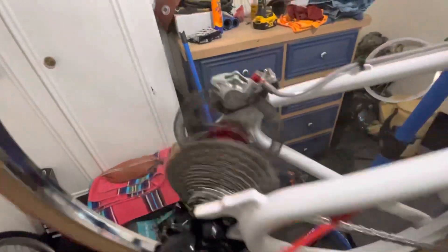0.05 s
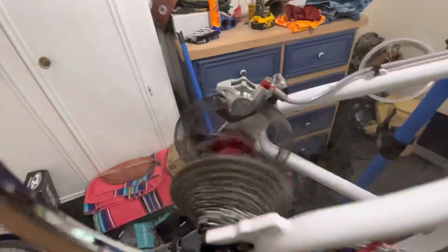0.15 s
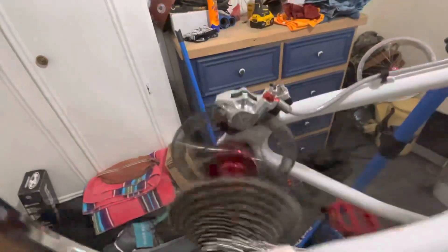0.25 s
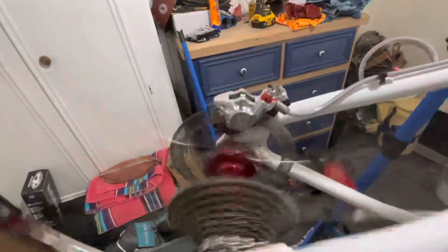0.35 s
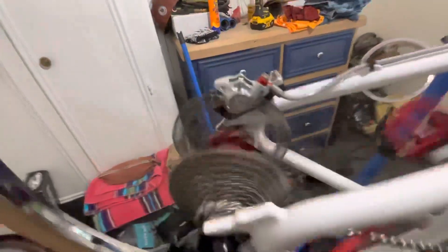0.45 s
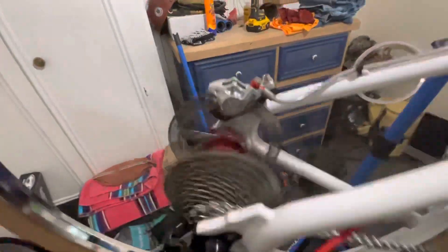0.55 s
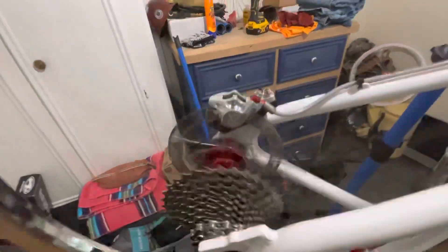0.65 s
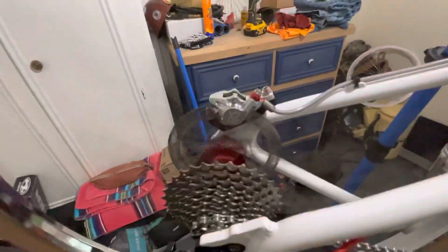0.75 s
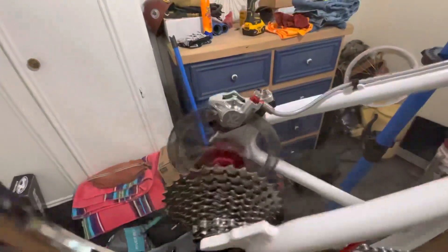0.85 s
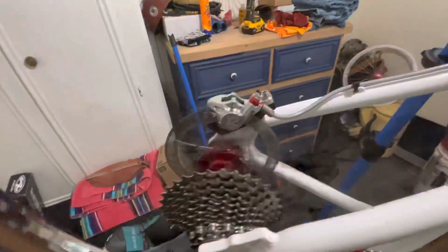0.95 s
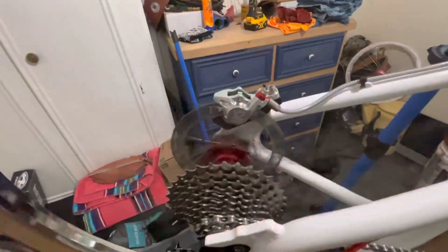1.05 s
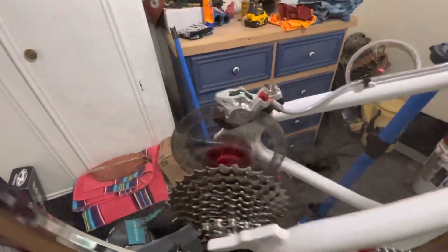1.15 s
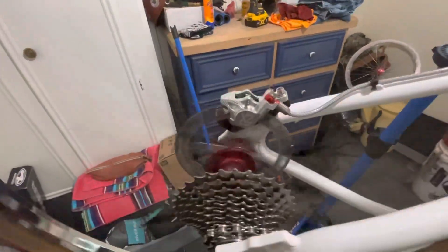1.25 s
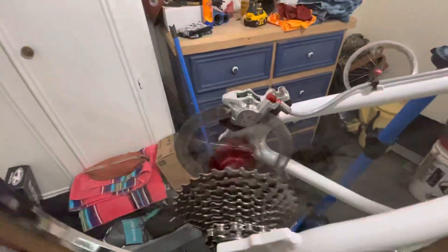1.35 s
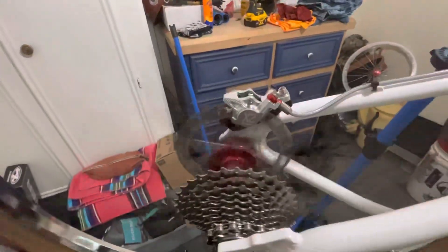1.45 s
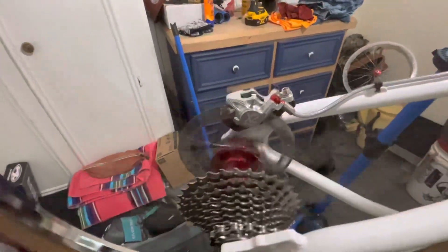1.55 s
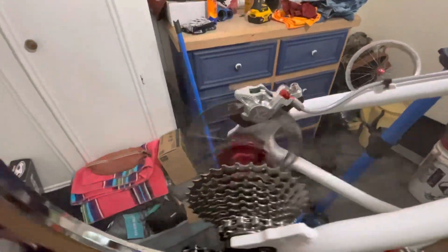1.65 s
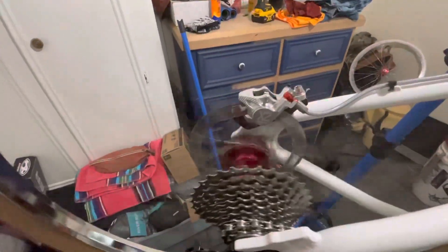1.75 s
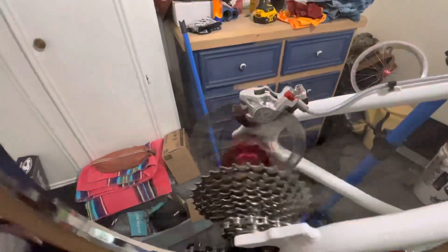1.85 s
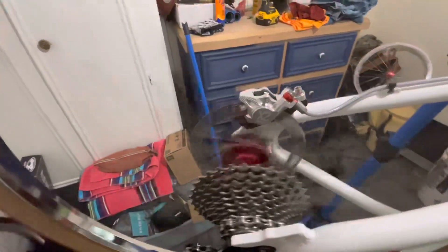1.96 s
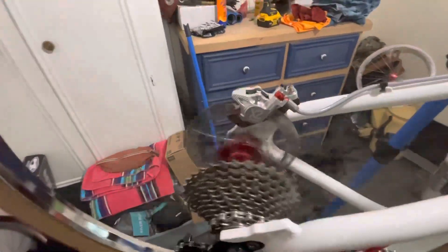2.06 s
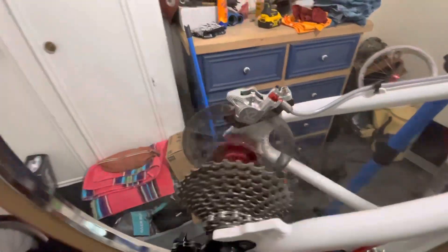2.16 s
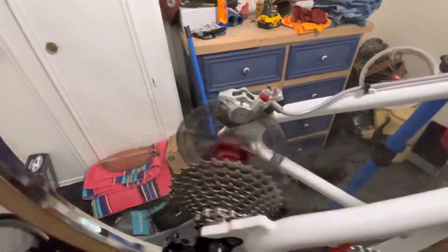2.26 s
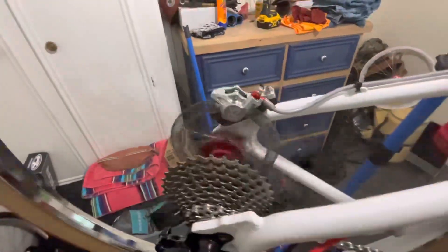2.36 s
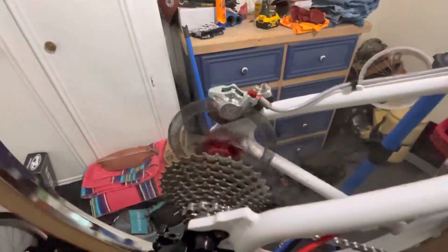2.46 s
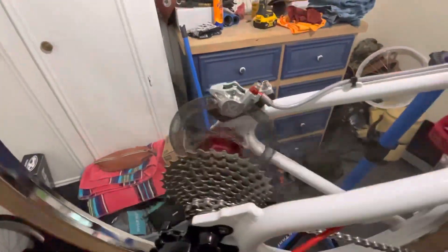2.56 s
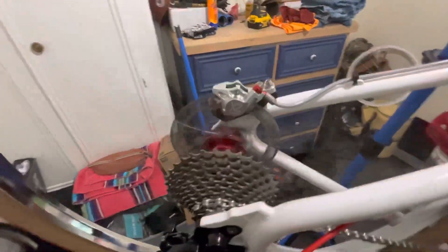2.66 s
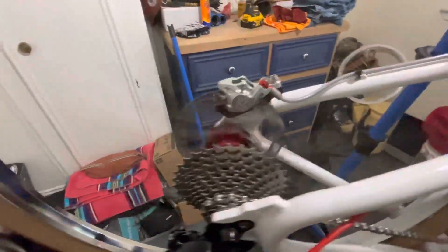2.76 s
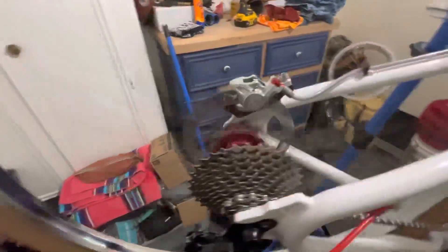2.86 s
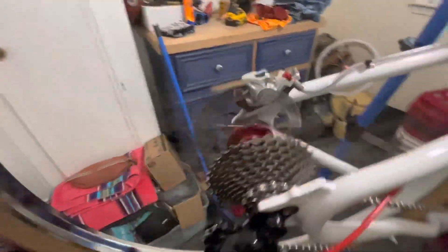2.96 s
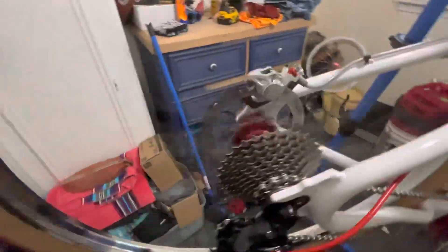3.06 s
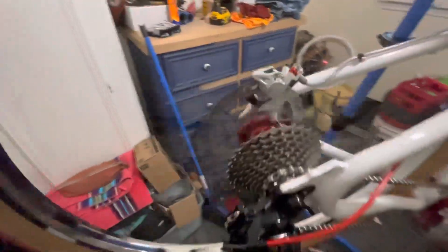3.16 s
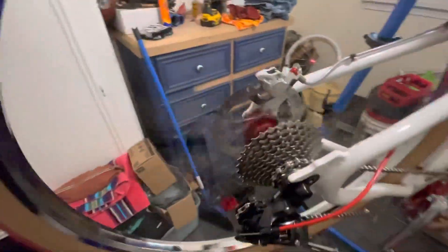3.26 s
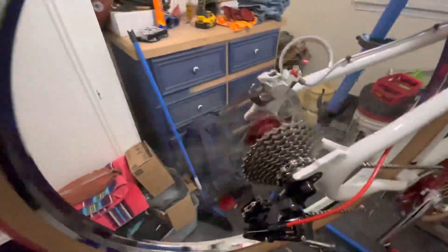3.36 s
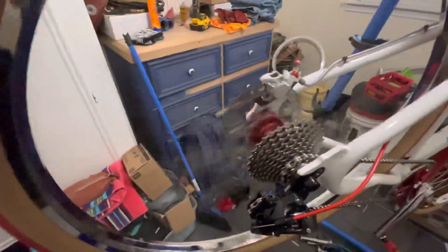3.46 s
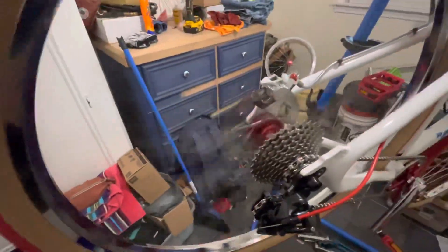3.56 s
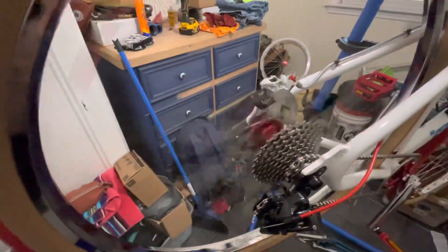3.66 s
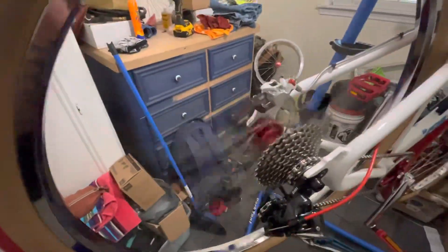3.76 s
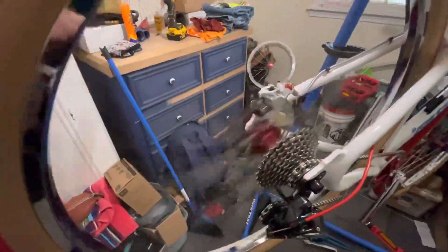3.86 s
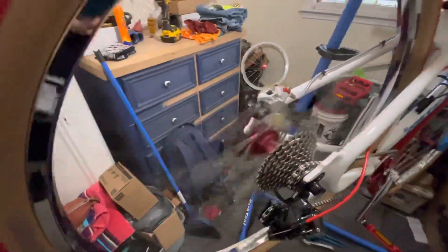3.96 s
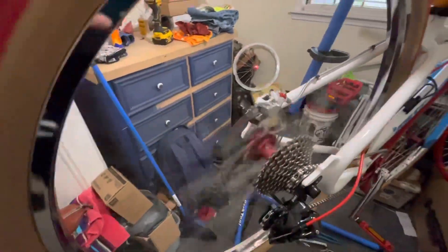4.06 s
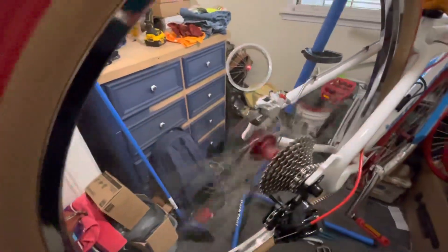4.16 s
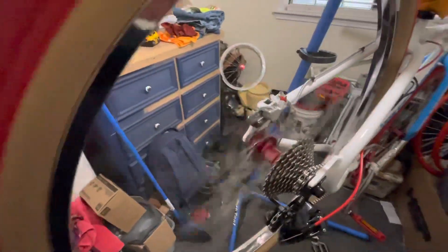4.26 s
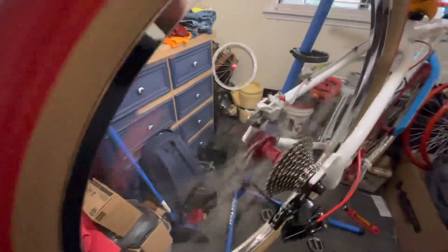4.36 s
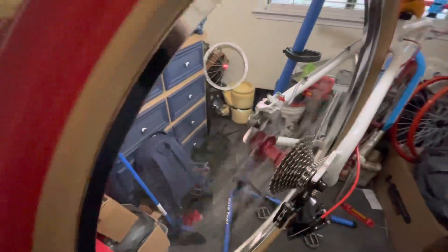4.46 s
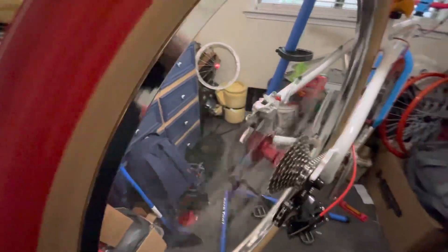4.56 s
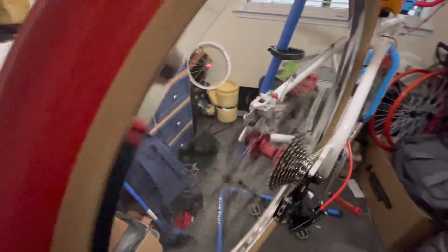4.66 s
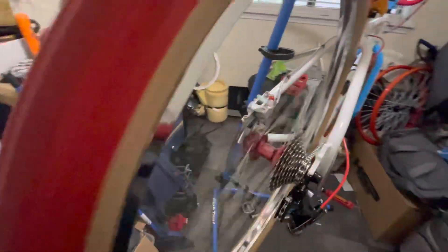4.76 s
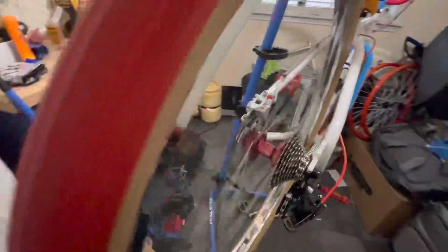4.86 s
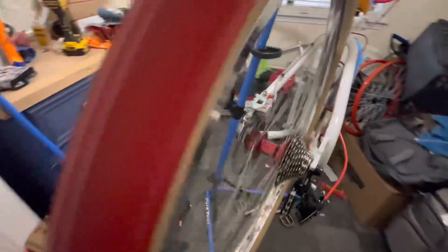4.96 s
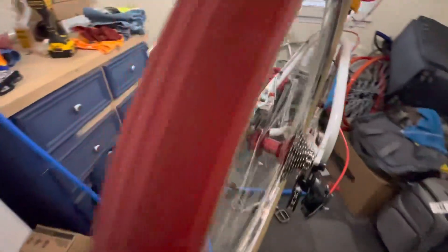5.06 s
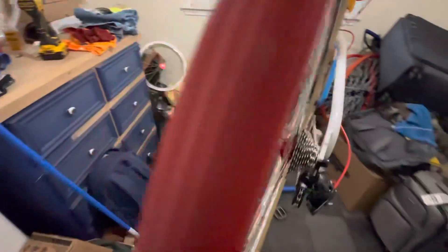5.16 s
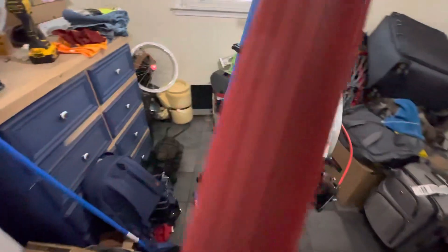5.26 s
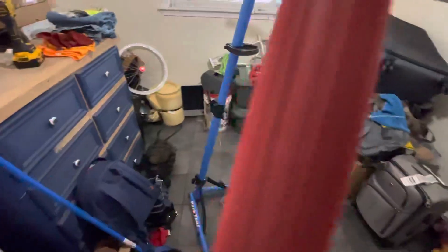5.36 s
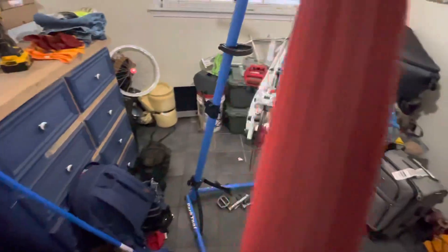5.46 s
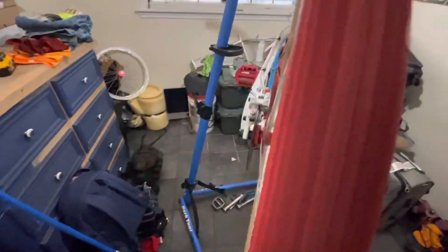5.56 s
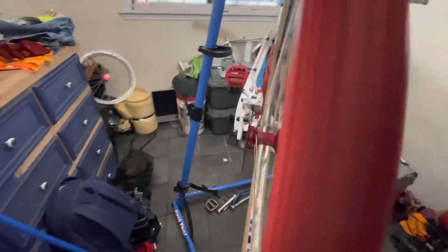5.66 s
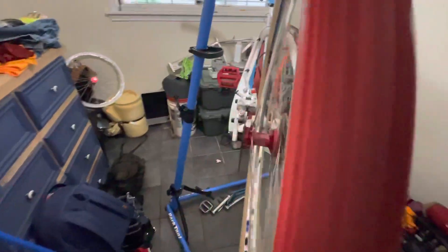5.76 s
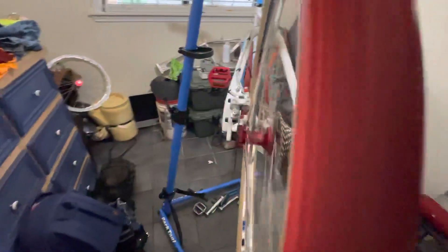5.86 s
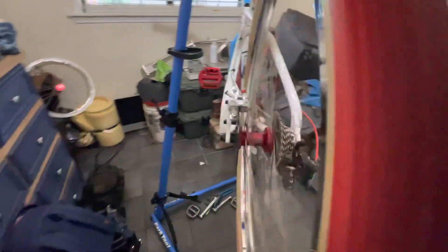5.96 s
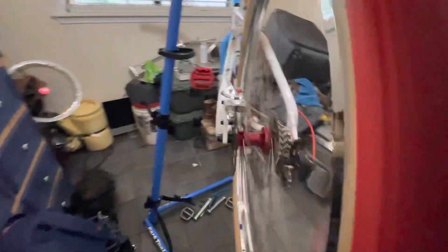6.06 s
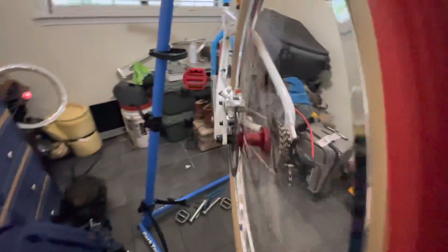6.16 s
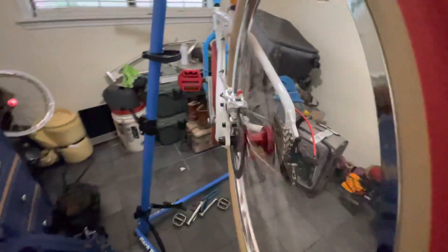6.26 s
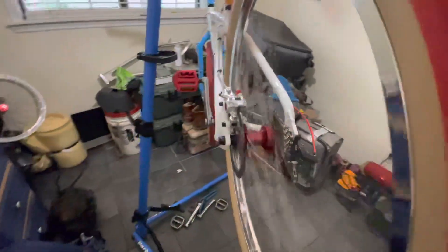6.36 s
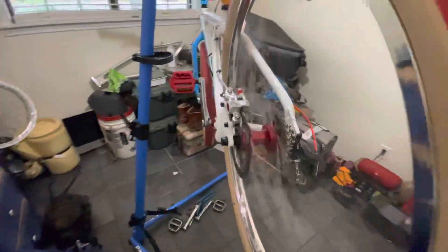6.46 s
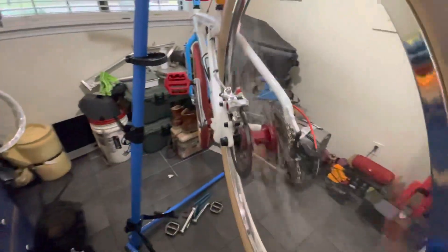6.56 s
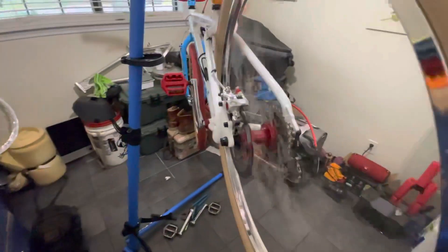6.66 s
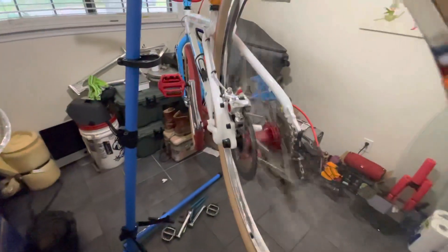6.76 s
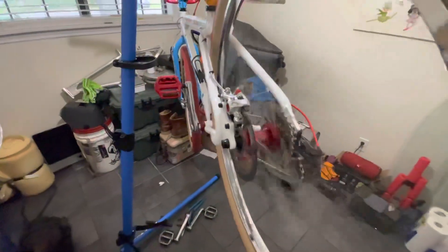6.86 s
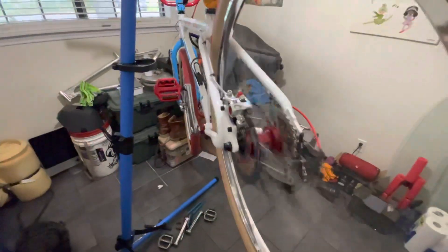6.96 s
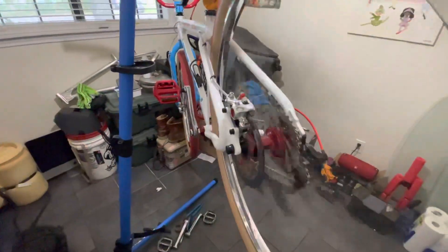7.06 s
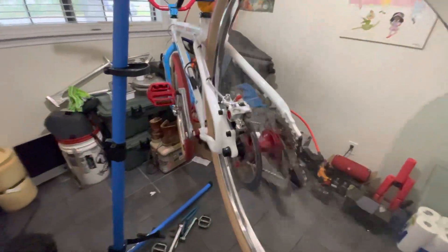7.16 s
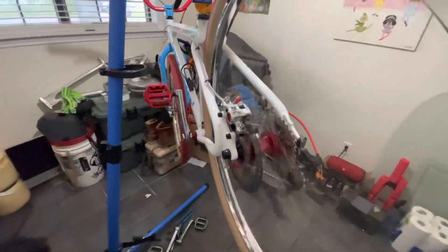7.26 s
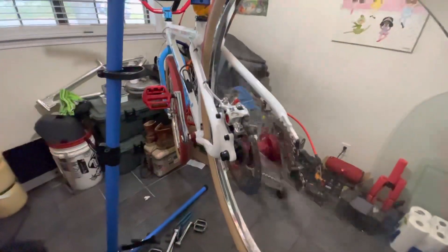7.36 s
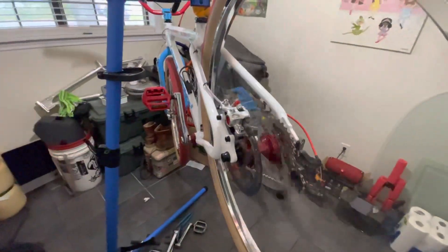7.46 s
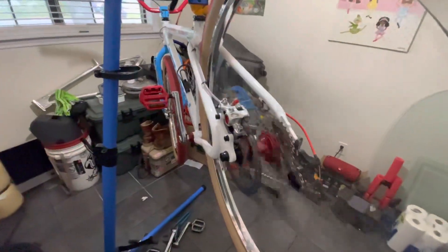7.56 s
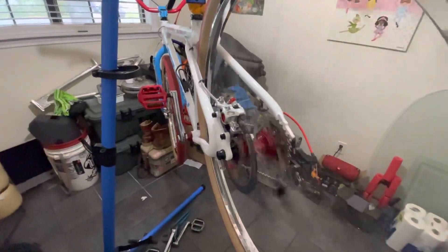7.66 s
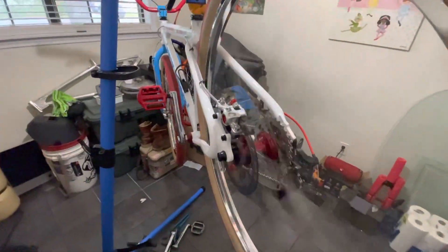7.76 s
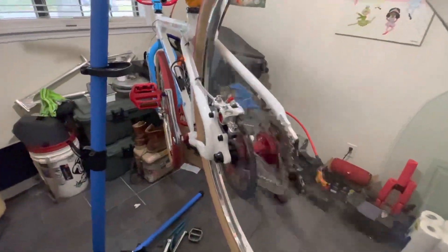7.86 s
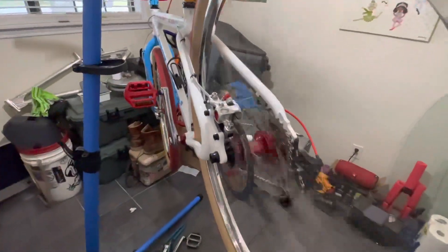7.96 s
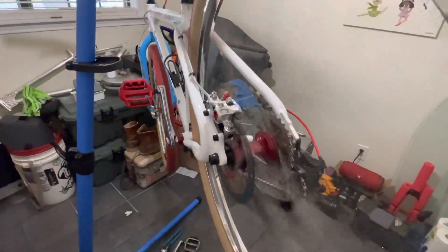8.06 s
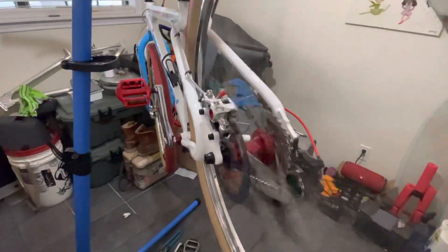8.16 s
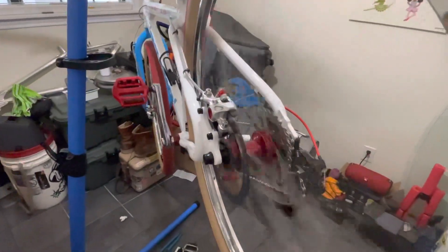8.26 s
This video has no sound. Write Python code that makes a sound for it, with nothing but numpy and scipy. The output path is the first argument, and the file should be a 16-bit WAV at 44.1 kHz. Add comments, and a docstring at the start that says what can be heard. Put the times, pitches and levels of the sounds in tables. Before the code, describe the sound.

A bicycle chain rattles and clanks over the rear sprockets for the first half second, heard close up in a small, quiet workshop. At about 0.5 seconds the drive lets go with a snap and the rear hub starts to buzz: a bright, dense stream of metallic ratchet clicks with a light steel ring. The buzz is loudest around 0.6 to 1.2 seconds, wavers slightly in pitch until about 3 seconds, then sinks slowly as the wheel loses speed. It grows softer towards 5.7 seconds, comes back up at 6 and is still going when the sound ends just after 8 seconds. Air from the spinning tyre buffets the microphone with low, fluttering puffs during the first 1.5 seconds and again from about 5 to 5.8 seconds. One soft, dull knock comes at about 7.3 seconds.

```python
"""Freehub coasting in a repair stand.

A small workshop, one microphone close to the wheel of a hanging bicycle. The chain rattles over the
sprockets for half a second, then the cranks stop and the freehub buzzes: three staggered pawls snap
over the ratchet teeth as the wheel slowly loses speed. The microphone moves round the wheel, whose
draught buffets it; one soft knock comes near the end."""
import sys
import numpy as np
from scipy import signal
from scipy.fft import rfft, irfft, next_fast_len
from scipy.io import wavfile
from scipy.ndimage import uniform_filter1d

SR = 44100
rng = np.random.default_rng(int(sys.argv[2]) if len(sys.argv) > 2 else 0)


def transcribe(signal):
    """Save signal, clipped to [-1, 1], as a 16-bit WAV file at the path in sys.argv[1]."""
    frames = np.atleast_2d(signal).T
    limited = np.clip(frames, -1, 1)
    pcm = np.round(limited * 32767).astype(np.int16)
    wavfile.write(sys.argv[1], SR, pcm)


N = 366912
T = np.arange(N) / SR
TEETH, PAWLS = 68, 3
COAST_S = .533  # the cranks stop

# the buzz as the microphone moves round the wheel (t/s, relative click level/dB, relative shell level/dB)
BUZZ_LEVELS = [(0.55, -21, -36), (0.61, -17.5, -26.5), (0.76, -19, -30), (1.15, -18.5, -29),
               (1.3, -21.5, -33.5), (2.4, -22.5, -32.5), (2.75, -23, -35.5), (2.81, -22, -33.5),
               (3.46, -25, -33.5), (4.83, -27, -36), (5.74, -29, -34), (5.95, -24.5, -32.5),
               (7.46, -23, -32.5), (8.28, -23.5, -32.5)]


def freehub():
    """Pawl strikes click, shake the hub and frame, and keep the steel parts ringing."""
    # ratchet speed: uneven while the cassette still creeps, then a slow run-down (t/s, tooth rate/Hz)
    speed = [(0.62, 293.4), (0.68, 295), (0.74, 323.8), (0.83, 317.2), (0.94, 334.0), (1.07, 320.8),
             (1.21, 330), (1.7, 320.2), (1.83, 330.3), (1.96, 327), (2.08, 344.3), (2.36, 310.4),
             (2.42, 313.4), (2.61, 286), (2.81, 298.4), (2.95, 298.0), (8.11, 251.3), (8.24, 250.3)]
    coasted = np.maximum(T - COAST_S, 0)
    # the freehub body shakes from the jolt of letting go, then from the slack chain (rms, in teeth)
    jolt = 0.0825 * np.exp(-coasted / 0.086)
    slack = 0.021 * np.exp(-coasted / 1.6)
    shake = (0.015 + jolt + slack) * noise([(3, -10.5), (12, -0.5), (35, 0.5), (90, -24), (300, -94)])
    teeth_passed = np.cumsum(curves(speed)[0]) / SR + shake
    pawls = [pawl(teeth_passed, index=k) for k in range(PAWLS)]
    buzz = pawl_clicks(pawls, teeth_passed) + hub_and_frame(pawls, teeth_passed)
    buzz += ringing_steel(pawls) + whine(teeth_passed)
    return buzz * np.clip(coasted / 0.019, 0, 1)


def pawl(teeth_passed, index, wobble=.035, tooth_error=.004, jitter=.011, scatter_db=1.3, tooth_db=.8):
    """One pawl drops off every tooth; the off-centre ring makes it early and late once a turn."""
    tooth = np.arange(int(teeth_passed[-1]) - 1)
    late, force = rng.standard_normal((len(tooth), 2)).T
    cut, height = rng.standard_normal((TEETH, 2))[tooth % TEETH].T  # each tooth has its own shape
    angle = 2 * np.pi * (tooth / TEETH + index / PAWLS)
    drop = tooth + index / PAWLS + wobble * np.sin(angle) + tooth_error * cut + jitter * late
    times = np.interp(drop, teeth_passed, T)
    return impulses(times, undb(scatter_db * force + tooth_db * height) * (times > COAST_S))


def pawl_clicks(pawls, teeth_passed):
    """Each pawl reaches the microphone by its own path: a short crack, a metallic tail, then the room."""
    # colour of the pawl's own click (f/Hz, level/dB)
    click_colour = [(2500, -58), (4000, -14), (4550, -20), (4900, -11), (5300, -8.5), (5900, -12),
                    (7000, -8.5), (7900, -2), (8900, -1), (9450, -7), (11000, -7.5), (11900, -11.5),
                    (13800, -12.5), (15000, -11), (15800, -11.5)]
    click_db, _ = curves(BUZZ_LEVELS)
    cracks = sum(paths(p, [(.005, -4.5), (.03, 0), (.25, 1)]) for p in pawls)
    clicks = steady(colour(cracks, click_colour), 0.25) * undb(click_db + 0.35)
    return clicks * once_a_turn(teeth_passed, depth_db=0.61, at_turn=0.85)


def hub_and_frame(pawls, teeth_passed):
    """The strikes travel through the wheel and sound the resonances of hub shell and frame."""
    # small parts radiate low notes poorly (f/Hz, gain/dB)
    radiation = [(300, -46), (600, -4.5), (1050, 2), (1400, 14), (4500, -1), (5500, -24), (8000, -15)]
    # resonances of the hub shell and of the frame (f/Hz, width/Hz, level/dB)
    shell_peaks = [(2076, 245, -2.5), (2390, 113, 1.5), (2498, 113, 0.5), (2697, 120, -3),
                   (2874, 220, -0.5), (3267, 390, 3.5), (3580, 83, -1), (3770, 76, -3.5), (3814, 39, 5.5),
                   (4670, 380, 5.5)]
    frame_peaks = [(1290, 220, -5.5), (1610, 80, -1.5), (1739, 38, 11)]
    # spectrum of the flicker that breaks the hub's notes into short pings (f/Hz, level/dB)
    flicker = [(8, -22), (25, -3), (55, 0), (150, -43), (400, -84)]
    # the frame's low notes at the microphone (t/s, level/dB)
    frame_level = [(0.55, -36.5), (1.61, -42), (4.34, -42), (5.87, -39), (7.32, -40), (8.07, -36),
                   (8.2, -36.5)]
    strikes = sum(through_wheel(p, teeth_passed, [(.012, -0.064), (.2, -0.066)]) for p in pawls)
    thrum = colour(strikes, radiation)
    _, shell_db = curves(BUZZ_LEVELS)
    flicker_db = 1.18 * noise(flicker)
    shell = steady(colour(thrum, resonances(shell_peaks)), 0.19) * undb(shell_db + 1 + flicker_db)
    frame = steady(colour(thrum, resonances(frame_peaks)), 0.33) * undb(curves(frame_level)[0])
    return (shell + frame) * once_a_turn(teeth_passed, depth_db=0.79, at_turn=0.16)


def ringing_steel(pawls):
    """Ratchet and sprockets ring on after each strike."""
    # modes of the ratchet and of the sprockets (f/Hz, level/dB, t60/s)
    ratchet_modes = [(3290, -5, .025), (4515, -9, .04), (6250, -8, .02), (9718, 2, .03), (10620, -1, .014),
                     (12235, -1, .025)]
    sprocket_modes = [(13155, -5, .05), (14145, 0, .035), (14358, -.5, .08)]
    # the sprockets' ring, strongest with the microphone beside the cassette (t/s, relative level/dB)
    sprocket_level = [(0.6, -32), (0.7, -30), (4.92, -39), (5.56, -47), (6.16, -39), (8.25, -38)]
    click_db, _ = curves(BUZZ_LEVELS)
    ratchet_db = -31 + 1.7 * (click_db + 22)  # fades faster than the clicks
    sprocket_db = curves(sprocket_level)[0] - 0.5
    strikes = paths(sum(pawls), [(.02, 0)])
    ratchet = steady(ring(strikes, modes(ratchet_modes)), 0.24) * undb(ratchet_db)
    sprockets = steady(ring(strikes, modes(sprocket_modes)), .3) * undb(sprocket_db)
    return ratchet + sprockets


def whine(teeth_passed):
    """The three pawls in turn add up to one fluttering tone at three times the tooth rate."""
    # the tone at the microphone (t/s, relative level/dB)
    whine_level = [(0.6, -47), (0.7, -45), (1.91, -55.5), (2.42, -43.5), (2.57, -48.5), (4.96, -51),
                   (5.02, -47.5), (8.2, -62)]
    flutter_db = 4.05 * noise([(5, -15.5), (14, 2), (30, -2), (90, -63), (300, -101)])
    tone = np.sqrt(2) * np.sin(2 * np.pi * PAWLS * teeth_passed)
    return tone * undb(curves(whine_level)[0] - 4 + flutter_db)


def through_wheel(x, teeth_passed, clouds, spin=0.77):
    """The wheel radiates in lobes that turn with it, so each harmonic swells at its own angle."""
    angle = 2 * np.pi * teeth_passed / TEETH
    lobes = [1] + [spin * wave(k * angle) for k in (1, 3) for wave in (np.cos, np.sin)]
    return sum(paths(x * lobe, clouds, count=8) for lobe in lobes)


def once_a_turn(teeth_passed, depth_db, at_turn):
    """Gain that swells once per wheel turn."""
    return undb(depth_db * np.cos(2 * np.pi * (teeth_passed / TEETH - at_turn)))


def chain(link_hz=52.9, rise_hz_per_s=9.2):
    """Rollers tick onto the sprockets, faster as the cranks speed up, until the cranks stop."""
    # the chain clanks on the cogs, and snaps as the drive lets go (t/s, relative level/dB)
    clank_hits = [(0.0204, -14.5), (0.1473, -24), (0.181, -17), (0.1882, -15.5), (0.259, -12), (0.368, -20),
                  (0.5327, -14), (0.537, -11), (0.545, -18)]
    # the chain's bright ticks, and the derailleur cage's dull clatter under a clank (f/Hz, level/dB)
    tick_colour = [(300, -12), (1200, -8), (3000, -1), (5000, -1.5), (7500, 6), (9200, 1.5), (10600, 5),
                   (12000, -5), (14500, 1), (15800, -4)]
    cage_colour = [(300, -24), (650, -8), (950, 4), (1700, 1), (3000, -22), (8000, -50)]
    links_passed = np.cumsum(link_hz + rise_hz_per_s * T) / SR
    links = np.arange(np.interp(COAST_S, T, links_passed) - 1)
    seat_s = .006 + np.interp(links, links_passed, T)
    rollers = impulses(seat_s, undb(-20 + 0.8 * rng.standard_normal(len(seat_s))))
    clank_s, clank_db = np.transpose(clank_hits)
    clanks = impulses(clank_s, undb(clank_db))
    cage = undb(11) * colour(paths(clanks, [(.08, 0)], count=64), cage_colour)
    ticks = paths(rollers + clanks, [(.02, 1), (.2, -5.5)], count=64)
    return undb(10) * colour(ticks, tick_colour) + cage


def chain_rumble(stroke_s=0.28, stop_s=0.72, runout_s=0.044):
    """Chain and jockey wheels rumble, swell mid-stroke and run out after the cranks stop."""
    # colour of the rolling parts (f/Hz, level/dB)
    rolling = [(150, -4.5), (500, -3), (1500, -2), (3000, -5.5), (6000, -12.5), (10000, -12), (15000, -23)]
    running = np.clip((stop_s - T) / runout_s, 0, 1)
    stroke_db = 2.5 * np.exp(-.5 * ((T - stroke_s) / 0.038) ** 2)
    rattle_db = 2.1 * noise([(8, -31), (30, 0), (70, -3), (200, -37), (500, -80)])
    return noise(rolling) * undb(-37.5 + stroke_db + rattle_db) * running


def draught():
    """Air dragged round by the tyre flutters on the microphone; single eddies reach higher in pitch."""
    # the microphone dips into the draught (t/s, length/s, level/dB)
    gusts = [(0.025, 0.023, -36), (0.09, 0.52, -48), (0.206, 0.05, -45), (0.63, 0.583, -43),
             (1.29, 0.18, -48), (1.55, 0.24, -56), (2.72, 0.326, -59), (5.045, 0.07, -50),
             (5.219, 0.49, -41.5), (5.768, 0.08, -47.5), (6.25, 0.1, -61)]
    # single eddies hit it (t/s, level/dB, width/s)
    eddy_hits = [(0.677, -27.5, 0.0063), (0.777, -37, 0.013), (1.059, -24, 0.012), (1.101, -30, 0.012),
                 (5.244, -30.5, 0.0076), (5.293, -32.5, 0.0097), (5.357, -43, 0.0066), (5.511, -33, 0.013),
                 (5.559, -39, 0.0038), (5.636, -28, 0.011), (5.67, -33, 0.0061), (5.733, -34.5, 0.0049)]
    # spectra of the flow, of its uneven puffing and of an eddy (f/Hz, level/dB)
    flow_colour = [(25, -39), (45, -4), (70, 6.5), (130, 0), (220, -8.5), (400, -20.5), (800, -43),
                   (3000, -87)]
    puffs = [(2, -20), (6, -1), (12, -2), (40, -40), (200, -90)]
    eddy_colour = [(40, -38), (90, 5.5), (170, 7.5), (300, -3.5), (500, -10), (800, -25.5), (1500, -51),
                   (4000, -90)]
    stir = undb(-77.5 + 2 * T)  # grows as the microphone comes round behind the tyre
    strength = stir + sum(undb(db) * gust(s, length) for s, length, db in gusts)
    flow = steady(noise(flow_colour), 0.28) * strength * undb(3 * noise(puffs))
    eddies = sum(undb(db) * np.exp(-.5 * ((T - s) / width) ** 2) for s, db, width in eddy_hits)
    return flow + eddies * steady(noise(eddy_colour), 0.028)


def gust(start, length, attack_s=.02, release_s=0.016):
    """Attack, hold and release of one spell of moving air."""
    rise = np.clip((T - start) / attack_s + 1, 0, 1)
    return rise * np.exp(-np.maximum(T - start - length, 0) / release_s)


def knock(at_s=7.275, thud_db=-32):
    """One soft, dull bump with a short boom."""
    # colour of the bump (f/Hz, level/dB)
    thud_colour = [(30, -40), (60, -10), (95, -1), (160, -7), (350, -15), (700, -17), (1500, -46),
                   (4000, -70)]
    # low boom after it (f/Hz, level/dB, t60/s)
    boom_modes = [(75.2, -54, .16), (125, -56, .12)]
    blow = impulses([at_s], np.ones(1))
    thud = colour(blow, thud_colour)
    return thud / np.max(np.abs(thud)) * undb(thud_db) + ring(blow, modes(boom_modes))


def room_tone():
    """The workshop's faint, steady background."""
    # colour of the quiet room (f/Hz, level/dB)
    room_colour = [(25, -33), (70, -7), (130, -3.5), (260, 3.5), (450, -4), (900, -1.5), (4000, -25)]
    return undb(-56.5) * noise(room_colour)


def paths(x, clouds, count=16):
    """Clouds of reflections (t60/s, level/dB) that crossfade as the microphone moves in count steps."""
    hop = N // count + 1
    out = np.zeros(N + SR)
    for k in range(count + 1):
        a, b = max((k - 1) * hop, 0), min((k + 1) * hop, N)
        share = np.cos(np.pi / 2 * (np.arange(a, b) / hop - k))
        response = sum(undb(db) * tail(t60) for t60, db in clouds)
        heard = signal.fftconvolve(x[a:b] * share, response)
        out[a:a + len(heard)] += heard
    return out[:N]


def tail(t60):
    """A dense decaying cloud of reflections with unit energy."""
    cloud = rng.standard_normal(SR // 2) * fade(t60)
    return cloud / np.linalg.norm(cloud)


def fade(t60):
    """Exponential decay, half a second long."""
    return np.exp(-np.log(1000) * T[:SR // 2] / t60)


def modes(rows):
    """Impulse response of modes (f/Hz, level/dB, t60/s)."""
    t = T[:SR // 2]
    return sum(undb(db) / np.sqrt(t60) * fade(t60) * np.sin(2 * np.pi * hz * t) for hz, db, t60 in rows)


def ring(x, response):
    """Play x through an impulse response."""
    return signal.fftconvolve(x, response)[:N]


def resonances(rows):
    """Response (f/Hz, gain/dB) of overlapping resonances (f/Hz, width/Hz, level/dB)."""
    f = np.geomspace(100, 16000, 900)
    power = sum(undb(db) ** 2 / (1 + ((f / hz - hz / f) * hz / width) ** 2) for hz, width, db in rows)
    return np.column_stack([f, 10 * np.log10(power)])


def impulses(times, sizes, order=8):
    """Band-limited impulses placed between samples."""
    at = np.asarray(times)[:, None] * SR
    taps = np.floor(at).astype(int) + np.arange(1 - order, order + 1)
    shape = np.sinc(taps - at) * np.sinc((taps - at) / order)
    return np.bincount(np.clip(taps, 0, N).ravel(), (sizes[:, None] * shape).ravel(), N + 1)[:N]


def colour(x, points):
    """Causal filter with a response (f/Hz, gain/dB), built from its cepstrum."""
    hz, db = np.transpose(points)
    size = next_fast_len(2 * N)
    size += size % 2
    f = np.maximum(np.arange(size // 2 + 1) * SR / size, 1)
    cepstrum = irfft(np.interp(np.log(f), np.log(hz), db) * np.log(10) / 20)
    cepstrum[1:size // 2] *= 2
    cepstrum[size // 2 + 1:] = 0
    return irfft(rfft(x, size) * np.exp(rfft(cepstrum)))[:N]


def noise(points):
    """Noise with a spectrum (f/Hz, level/dB), scaled to an rms of 1."""
    x = colour(rng.standard_normal(N), points)
    return x / np.sqrt(np.mean(x ** 2))


def steady(x, span):
    """Scale to a running rms of 1 over span seconds."""
    size = int(span * SR)
    power = uniform_filter1d(uniform_filter1d(x ** 2, size), size // 2)
    return x / np.sqrt(np.abs(power) + 1e-3 * np.mean(x ** 2))


def curves(rows):
    """The columns after t/s as one value per sample."""
    s, *columns = np.transpose(rows)
    return [np.interp(T, s, c) for c in columns]


def undb(db):
    """Decibels to gain."""
    return 10 ** (np.asarray(db) / 20)


def scene():
    """Bicycle and workshop at one microphone, the same in both channels."""
    mid = freehub() + chain() + chain_rumble() + draught() + knock() + room_tone()
    return np.array([mid, mid])


def record(dry):
    """The microphone cuts the rumble below 42 Hz and the top above 15.8 kHz."""
    dry = signal.sosfilt(signal.butter(3, 42, "highpass", fs=SR, output="sos"), dry)
    return signal.sosfilt(signal.ellip(12, .1, 80, 15800, fs=SR, output="sos"), dry)


dry = scene()
out = record(dry)
transcribe(out)
```